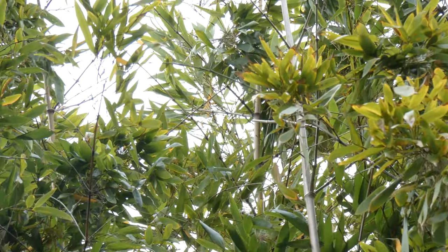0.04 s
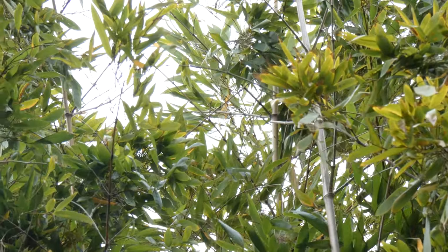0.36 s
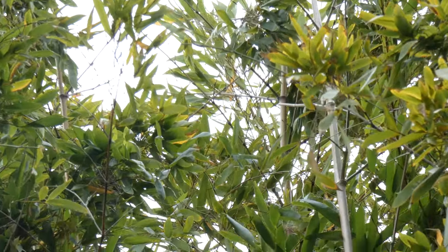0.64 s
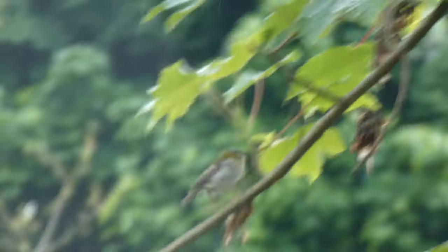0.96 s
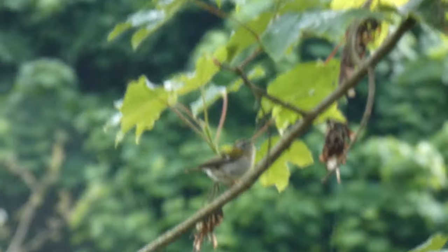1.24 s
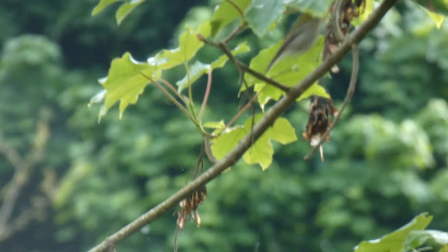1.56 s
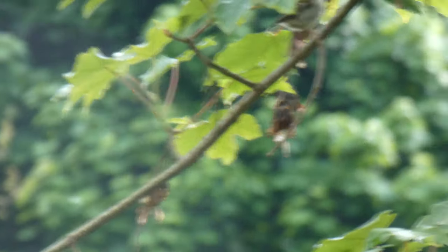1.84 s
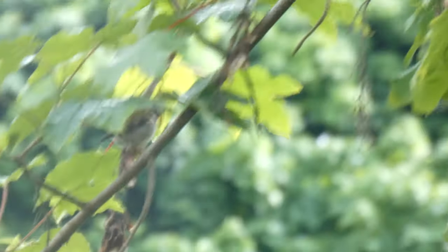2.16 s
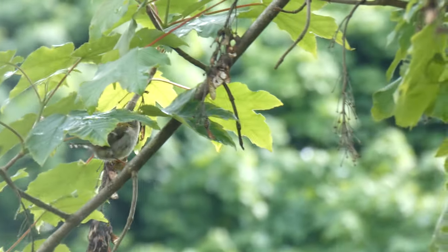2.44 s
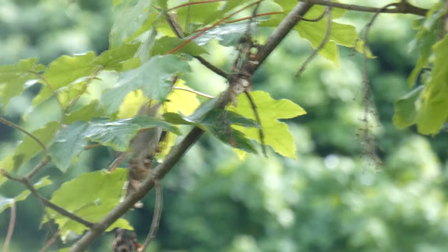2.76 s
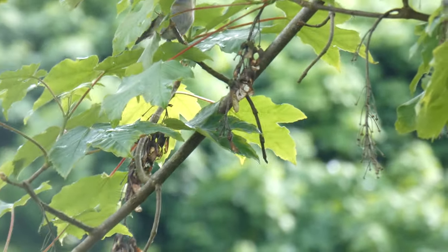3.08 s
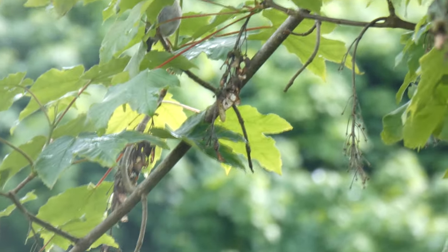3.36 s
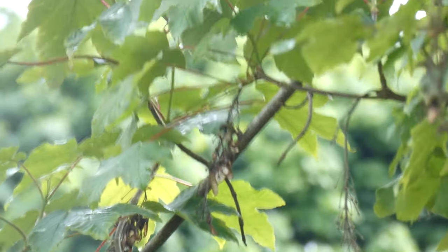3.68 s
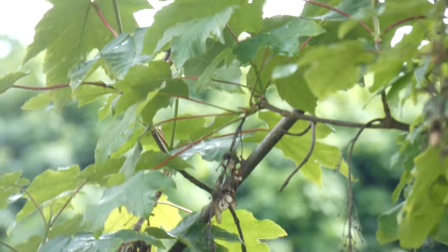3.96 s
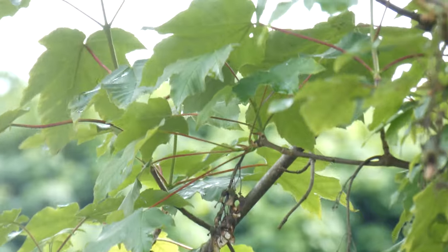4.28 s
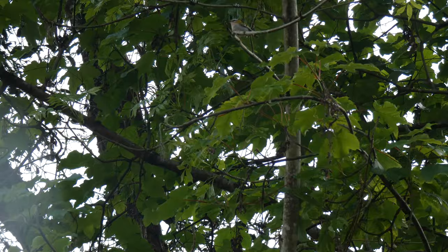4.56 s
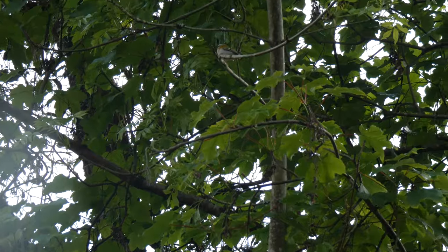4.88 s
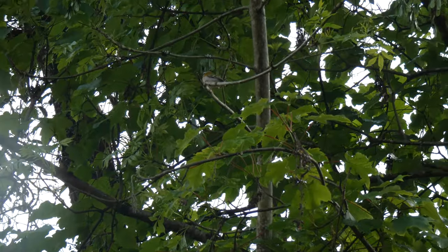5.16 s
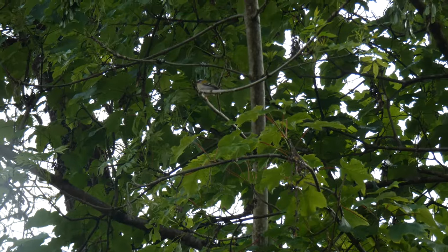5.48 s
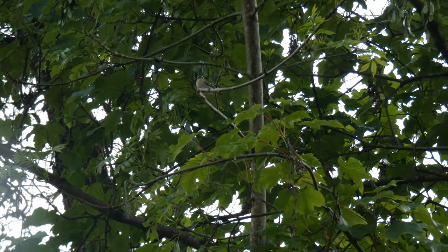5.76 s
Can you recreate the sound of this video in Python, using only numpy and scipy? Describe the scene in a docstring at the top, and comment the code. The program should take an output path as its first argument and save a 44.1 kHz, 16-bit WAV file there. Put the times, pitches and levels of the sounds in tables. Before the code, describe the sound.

Three short stretches of steady outdoor hush among trees, separated by silence. First come a nearby songbird's thin, rising whistles, with handling bumps and a zoom whirr right at the microphone. Next, the camera lens knocks softly and unevenly while other birds call faintly in the distance. Last, a more distant run of very high notes sounds over the knocking, closing with scuffs and clicks on the casing and the zoom motor again.

```python
"""Firecrest in leafy trees, with camera noises

Three short stretches, silence between. A firecrest's thin whistles near 7 kHz scatter in the foliage;
other birds call far off over a steady outdoor hush. A hand-held camera adds its own sounds:
fingers bump and scuff the casing, the zoom motor whirrs, the lens mechanism knocks softly."""
import sys
import numpy as np
from scipy import signal
from scipy.fft import rfft, irfft
from scipy.io import wavfile

SR = 44100
rng = np.random.default_rng(int(sys.argv[2]) if len(sys.argv) > 2 else 0)


def master(y):
    """Save y as 16-bit WAV."""
    cut = np.clip(np.atleast_2d(y).T, -1, 1)
    pcm = np.round(cut * 32767)  # scale
    wavfile.write(sys.argv[1], SR, pcm.astype(np.int16))


N = 261072
TIME = np.arange(N) / SR
FREQS = np.maximum(np.fft.rfftfreq(N, 1 / SR), 1)

# audible stretches: start/s, end/s
STRETCHES = [(0, .676), (.916, 4.287), (4.516, 5.93)]


def from_db(db):
    """Decibels to gain."""
    return 10 ** (np.asarray(db) / 20)


def unit_rms(x):
    """Scale to unit power."""
    return x / np.sqrt(np.mean(x ** 2) + 1e-20)


def pan(db):
    """Channel gains for left minus right level."""
    return from_db(np.array([[db], [-db]]) / 2)


def over_freqs(points):
    """Interpolate (f/Hz, value) rows on a log axis."""
    hz, value = np.transpose(points)
    return np.interp(np.log(FREQS), np.log(np.sort(hz)), value)


def drift(corner_hz):
    """Low-passed noise, unit RMS."""
    return unit_rms(irfft(rfft(rng.standard_normal(N)) / (1 + (FREQS / corner_hz) ** 4), N))


def resonate(x, hz, width_hz):
    """Two-pole resonance, unit peak gain."""
    r = np.exp(-np.pi * width_hz / SR)
    poles = [1, -2 * r * np.cos(2 * np.pi * hz / SR), r * r]
    return signal.lfilter(np.array([1, 0, -1]) * (1 - r * r) / 2, poles, x + 1e-18)


def band(x, hz, width_hz):
    """Two equal resonances in series."""
    return resonate(resonate(x, hz, width_hz), hz, width_hz)


def band_noise(hz, width_hz):
    """Narrowband noise, unit RMS."""
    return unit_rms(band(rng.standard_normal(N), hz, width_hz))


def thud(start_s, hz, decay_s):
    """Softly pushed mode: swells to 1 in one decay time, then dies."""
    out, start = np.zeros(N), int(start_s * SR)
    t = TIME[:min(SR // 5, N - start)]
    out[start:start + len(t)] = t / decay_s * np.exp(1 - t / decay_s) * np.sin(2 * np.pi * hz * t)
    return out


def hush(spectrum, sway_db):
    """Far trees and microphone hiss; channels most alike in the bass and near 3 kHz."""
    # f/Hz, left-right correlation
    correlation = [(60, .93), (150, 0.94), (300, 0.9), (700, 0.44), (1400, 0.77), (3100, 0.99),
                   (7000, 0.81), (10000, 0.66), (15000, .65)]
    # f/Hz, left minus right/dB
    balance = [(60, 0.5), (200, 0), (400, 3.5), (700, -1.5), (1300, 4), (4400, 1), (8000, -1), (15000, -6)]
    mid, side = rfft(rng.standard_normal((2, N)))
    alike = np.clip(over_freqs(correlation), 0, .999)
    stereo = mid + np.sqrt((1 - alike) / (1 + alike)) * side * [[1], [-1]]
    colour = from_db(over_freqs(spectrum) + over_freqs(balance) / 2 * [[1], [-1]])
    return np.sqrt(SR / 2) * irfft(stereo * colour, N) * from_db(sway_db * drift(3.2))


def syllable_note(start_s, length_s, hz, db, syllable):
    """Contour of one firecrest syllable: t/s, f/Hz, level/dB."""
    # per syllable: share of length, pitch offset/Hz, level offset/dB
    shapes = {"falling": [(0, -1200, -14), (.05, -400, -10.5), (.11, 521, -7), (.2, 558, -4.5),
              (.35, 492, -3.5), (.47, 451, 1), (.54, 20, -2.5), (.62, -39.5, -3.5), (.75, 229.5, -1),
              (.85, -11.5, -1), (.95, -11.5, 2), (1, 21, -0.5)], "wavy": [(0, -1150, -22), (.08, 427, -7.5),
              (.25, 50, -2), (.36, 188, -7), (.53, 305, 1.5), (.68, 118, -6), (.82, -44, 2.5),
              (1, 25, -13)], "hooked": [(0, -1150, -6), (.07, 222, -1), (.2, 220, -4.5), (.42, 388, 3),
              (.62, 412, -9), (.75, -540, -5), (.86, -150, 8.5), (1, 0, 4)], "arched": [(0, -1200, -14),
              (.09, -28, -17), (.25, 70, -5.5), (.45, 227, -1), (.63, 402, -6), (.71, -190, -2),
              (.86, -61, 5), (1, 40, 7)]}
    return np.array(shapes[syllable]) * [length_s, 1, 1] + [start_s, hz, db]


def firecrest(song, waver_hz, tremor_hz, flutter_db, buzz_hz, octave_db):
    """Near-pure whistle with a fast, uneven tremor; an optional buzz early in each note."""
    buzz_at_s, buzz_width_s, buzz_rate_hz, edge_s = .022, .013, 270, .0013
    out, flutter = np.zeros(N), from_db(flutter_db * drift(120))
    shake_hz = waver_hz * drift(160) + tremor_hz * band_noise(hz=240, width_hz=150)
    rasp = np.sin(2 * np.pi * np.cumsum(buzz_rate_hz * (1 + .3 * drift(200))) / SR)
    for note in song:
        s, hz, db = np.transpose(note)
        s = np.sort(s)
        on = (TIME >= s[0]) & (TIME <= s[-1])
        t = TIME[on]
        age = t - s[0]
        buzz = buzz_hz * np.exp(-((age - buzz_at_s) / buzz_width_s) ** 2) * rasp[on]
        phase = 2 * np.pi * np.cumsum(np.interp(t, s, hz) + shake_hz[on] + buzz) / SR
        tone = np.sin(phase) + from_db(octave_db) * np.sin(2 * phase)
        edges = np.clip(np.minimum(age, s[-1] - t) / edge_s, 0, 1)
        out[on] += edges * from_db(np.interp(t, s, db)) * tone
    return np.sqrt(2) * out * flutter


def foliage(x, wet_db, t60_s, spread):
    """Direct sound plus dense echoes off leaves and trunks, nearly alike in both channels."""
    t = TIME[:SR]
    mid, side = rng.standard_normal((2, SR)) * from_db(-60 * t / t60_s) * (1 - np.exp(-t / .004))
    echoes = (mid + spread * side * [[1], [-1]]) / np.sqrt(np.sum(mid ** 2))
    return x + from_db(wet_db) * signal.fftconvolve(echoes, x[None], axes=1)[:, :N]


def casing(force, damping):
    """Camera body modes, alternating in sign; a second, wider filter keeps the valleys deep."""
    # f/Hz, width/Hz, level/dB
    modes = [(315, 99, 0.5), (958, 180, -19.5), (1740, 130, .5), (2327, 50, 5.5), (2833, 170, 2.5),
             (3330, 230, 0), (4270, 180, -9), (4870, 100, -7), (5520, 100, -4.5), (9900, 2800, -15)]
    return sum((-1) ** k * from_db(db) * resonate(resonate(force, hz, damping * width), hz, 4 * width)
               for k, (hz, width, db) in enumerate(modes))


def handling(crack_hz, finger_pan_db, grip_hz):
    """Gritty clicks and scuffs ring the casing; soft fingers rub and thump it."""
    # zoom lever and gear clicks: t/s, ring peak/dB, f/Hz
    clicks = [(0.459, -41, 3500), (0.4864, -28, 2600), (0.4883, -27, 3000), (.581, -32, 2780),
              (0.611, -32, 3250), (0.6141, -28.5, 2384), (.919, -33, 3380), (5.6364, -35, 2930),
              (5.6455, -29.5, 2780), (5.6478, -37, 1870), (5.658, -42, 1990), (5.681, -35, 1900),
              (5.6837, -36, 2900), (5.724, -35.5, 2780), (5.8513, -25.5, 2770), (5.8539, -28.5, 3180)]
    # finger scuffs: t/s, grit/dB, decay/s, crack/dB
    scuffs = [(.005, -50, 0.024, -71), (.157, -56, 0.03, -80), (5.63, -39.5, 0.008, -64.5),
              (5.637, -35, 0.005, -76), (5.6455, -33, 0.0024, -61), (5.652, -37.5, 0.025, -76),
              (5.67, -38.5, 0.013, -82), (5.681, -30, 0.0027, -35), (5.696, -44, 0.0076, -80),
              (5.798, -41, 0.0087, -80)]
    # hand rubbing: t/s, level/dB
    grip_levels = [(0, -58.5), (.15, -51), (.25, -63.5), (.3, -45), (.43, -69.5), (.52, -76.5), (.68, -63)]
    # finger bumps: t/s, level/dB, centre/Hz, spread/octaves
    bumps = [(.283, -33.5, 470, 0.41), (.485, -39, 363, 0.37), (5.631, -47, 500, .3),
             (5.645, -32.5, 1850, 0.36), (5.656, -35, 506, 0.36), (5.681, -36, 500, 4.6),
             (5.694, -38, 670, 0.88), (5.707, -32.5, 245, 0.34), (5.72, -45, 245, 0.29),
             (5.798, -46.5, 232, 2.3), (5.85, -38, 320, 0.5)]
    click_decay_s, finger_damping = .0036, 1.8
    force, snap = np.zeros((2, N))
    contacts = [(s, db - 10, click_decay_s, db - 60) for s, db, _ in clicks] + list(scuffs)
    for s, grit_db, decay_s, crack_db in contacts:
        fade = (TIME >= s) * np.exp(-np.clip((TIME - s) / decay_s, 0, 20))
        force += from_db(grit_db) * fade
        snap += from_db(crack_db) * fade ** 2
    rings = sum(from_db(db) * thud(s, hz, decay_s=.00088) for s, db, hz in clicks)
    grit = rng.standard_normal(N) + .56 * rng.standard_normal((2, N))
    scrape = casing(force * grit, finger_damping) / np.std(casing(grit[0], finger_damping))
    skin = from_db(-13.5) * force * unit_rms(band(grit, hz=1305, width_hz=2000))
    crack = 3 * band(snap * grit, crack_hz, width_hz=5000)
    thumps = sum(finger_bump(*row) for row in bumps)
    thumps = signal.sosfilt(signal.butter(4, 85, "high", fs=SR, output="sos"), thumps)
    grip_gain = from_db(np.interp(TIME, *np.transpose(grip_levels))) * (TIME < STRETCHES[0][1])
    grip = grip_gain * unit_rms(band(grit, grip_hz, width_hz=300))
    return scrape + skin + rings + crack + (thumps + grip) * pan(finger_pan_db)


def zoom_motor(run, uneven_db, rub, spread, soft_hz, gear_hz, gear_db, whine_hz, whine_db, rub_pulse):
    """Each turn ticks the casing; the gears rub hardest just after it and whine in one mode."""
    play_turns, tooth_detune = .07, .089
    s, rates, db = np.transpose(run)
    s = np.sort(s)
    rate_hz = np.interp(TIME, s, rates)
    gain = from_db(np.interp(TIME, s, db)) * (TIME >= s[0]) * (TIME <= s[-1])
    turns = np.cumsum(rate_hz * (1 + .008 * drift(55)) * (TIME >= s[0])) / SR
    turns = np.maximum.accumulate(turns + play_turns * drift(70) * (turns > 0))
    ticks = np.diff(np.floor(turns), prepend=0) * np.sqrt(SR / rate_hz)
    ticks *= from_db(uneven_db * np.tanh(drift(90)))
    ticks = signal.sosfilt(signal.butter(3, soft_hz, fs=SR, output="sos"), ticks)
    tooth = rng.integers(-1, 2, N)   # each tick rings near the gear's pitch in its own colour
    teeth = sum(resonate(ticks * (tooth == k), gear_hz * (1 + k * tooth_detune), 900)
                for k in (-1, 0, 1))
    friction = rub * rng.standard_normal(N) + spread * rng.standard_normal(N) * [[1], [-1]]
    friction *= 1 + rub_pulse * np.cos(2 * np.pi * turns - 1)
    rattle = casing(.5 * ticks + from_db(gear_db) * teeth + friction, damping=1.03)
    whine = from_db(whine_db) * band_noise(whine_hz, width_hz=220)
    return gain * (rattle / np.std(rattle[:, turns > 0]) + whine)


def finger_bump(start_s, db, centre_hz, spread_oct):
    """A finger pushes the camera's low modes, most those near centre_hz."""
    # f/Hz, level/dB, decay/s
    modes = [(145, 3, 0.0056), (247, 2, 0.0052), (484, -1, 0.0044), (725, -6, 0.0048), (988, 3, 0.00204),
             (1880, -3, 0.005)]
    return sum(from_db(db + mode_db) * np.exp(-.5 * (np.log2(hz / centre_hz) / spread_oct) ** 2)
               * thud(start_s, hz, decay_s) for hz, mode_db, decay_s in modes)


def bird_calls(calls, waver_hz):
    """Gliding whistles that swell and fade; a wide waver makes thin trills."""
    out, waver = np.zeros(N), drift(240)
    for s, length_s, start_hz, end_hz, db in calls:
        on = (TIME >= s) & (TIME < s + length_s)
        part = (TIME[on] - s) / length_s
        hz = start_hz + (end_hz - start_hz) * part + waver_hz * waver[on]
        swell = np.sqrt(np.abs(np.sin(np.pi * part)))
        out[on] += from_db(db) * swell * np.sin(2 * np.pi * np.cumsum(hz) / SR)
    return out


def distant_birds():
    """Far whistles, faint contact calls and trills, scattered by the trees."""
    # all three: t/s, length/s, start/Hz, end/Hz, level/dB
    whistles = [(.513, 0.036, 3890, 3260, -42), (.646, 0.017, 4540, 4630, -47.5),
                (.661, 0.025, 3790, 3500, -43.5), (1.45, 0.071, 3580, 3250, -46),
                (1.729, 0.06, 4730, 4400, -46), (1.95, 0.071, 4480, 4635, -50.5),
                (2.07, 0.11, 4630, 4490, -57.5), (2.34, 0.067, 3870, 3714, -47.5),
                (2.354, 0.079, 3410, 3290, -49), (2.47, 0.079, 3808, 3804, -42.5),
                (3.065, 0.031, 3630, 3580, -49), (3.092, 0.06, 3360, 3370, -51.5),
                (3.158, 0.095, 3110, 2980, -53), (3.875, 0.055, 3400, 3290, -54),
                (3.948, 0.059, 3110, 2995, -48.5), (5.44, 0.035, 3510, 3410, -49.5),
                (5.715, 0.081, 4550, 4580, -53.5)]
    contact_calls = [(2.62, 0.017, 6330, 6520, -57.5), (3.829, 0.016, 6640, 6680, -66)]
    trills = [(1.23, 0.5, 7040, 7310, -68.5), (1.7, 0.64, 6750, 6750, -71)]
    calls = bird_calls([*whistles, *contact_calls], waver_hz=42) + bird_calls(trills, waver_hz=348)
    return foliage(calls, wet_db=.5, t60_s=.75, spread=.098)


def lens(hz, decay_s, chatter_db, chatter_per_s, width_hz, lower_hz, lower_db):
    """The lens mechanism keeps adjusting: clear knocks on one mode, small nudges on two."""
    # t/s, peak/dB
    clear_knocks = [(.938, -43), (.991, -50), (1.065, -48.5), (1.183, -44.5), (1.379, -47), (1.44, -45),
                    (1.507, -48.5), (1.638, -48), (1.683, -51), (1.825, -41.5), (1.957, -45),
                    (2.038, -40.5), (2.113, -51), (2.166, -41), (2.236, -44.5), (2.272, -60),
                    (2.333, -44.5), (2.426, -57), (2.505, -41.5), (2.545, -45.5), (2.726, -48),
                    (2.76, -48.5), (2.856, -49), (3.015, -46.5), (3.158, -44.5), (3.215, -47), (3.277, -56),
                    (3.368, -44.5), (3.4, -50), (3.432, -46), (3.496, -47), (3.558, -49.5), (3.676, -46.5),
                    (3.736, -47), (3.868, -46), (3.96, -45.5), (4.055, -43), (4.101, -52.5), (4.159, -42.5),
                    (4.247, -46), (4.521, -48.5), (4.585, -49), (4.617, -42), (4.75, -48.5), (4.821, -43),
                    (4.923, -41.5), (4.957, -44), (5.003, -46), (5.053, -41), (5.125, -43.5), (5.179, -58),
                    (5.25, -41), (5.355, -48.5), (5.415, -40), (5.456, -47.5)]
    # chatter in stretches two and three: t/s, level/dB
    effort = [
        [(0.93, -56), (1.73, -56), (1.79, -62), (1.87, -50.5), (2.1, -51.5), (2.55, -52.5), (2.65, -60),
         (3.42, -52), (3.6, -55), (4.28, -55)],
        [(4.52, -55), (5.45, -56.5), (5.55, -63), (5.6, -54)],
    ]
    knocks = sum(from_db(db) * thud(s, hz * (1 + .022 * rng.standard_normal()), decay_s)
                 for s, db in clear_knocks)
    nudges = (rng.random(N) < chatter_per_s / SR) * rng.choice([-1, 1], N)
    main, lower = (unit_rms(band(nudges, f, width_hz)) for f in (hz, lower_hz))
    gain = from_db(chatter_db + np.interp(TIME, *np.vstack(effort).T)) * (TIME > STRETCHES[1][0])
    return knocks + gain * (main + from_db(lower_db) * lower)


def opening_note(start_s, length_s, start_hz, end_hz, flick_hz, db, peak_share):
    """Contour of a firecrest note that slopes, swells and may end in an upward flick: t/s, f/Hz, level/dB."""
    swell_db, fade_db, flick_s, hold_s = 16.5, 10.5, .0063, .0043
    part = np.linspace(0, 1, num=60)
    to_top_s = np.maximum((1 - part) * length_s - hold_s, 0)
    hz = start_hz + (end_hz - start_hz) * part ** .77 + flick_hz * np.exp(-to_top_s / flick_s)
    envelope_db = np.interp(part, [0, peak_share, 1], [-swell_db, 0, -fade_db])
    return np.transpose([start_s + length_s * part, hz, db + envelope_db])


def scene():
    """Birds and camera sounds over a different hush in each stretch."""
    # close, rising climax; farther song after its opening: t/s, length/s, f/Hz, level/dB, syllable
    near_notes = [(-.09, 0.11, 6870, -28.5, "falling"), (.062, 0.11, 7083, -29.5, "falling"),
                  (0.2, .105, 7280, -30, "falling"), (0.356, 0.11, 7486, -29, "falling")]
    far_notes = [(5.342, 0.1, 7060, -38.5, "wavy"), (5.485, 0.12, 7215, -40, "wavy"),
                 (5.632, .119, 7230, -40.5, "hooked"), (5.798, 0.14, 7370, -38.5, "arched")]
    # farther song's opening: t/s, length/s, start/Hz, end/Hz, flick/Hz, level/dB, peak at share of length
    opening = [(4.541, 0.12, 6970, 7030, 0, -41.5, 0.41), (4.688, 0.12, 7030, 6990, 0, -41, 0.26),
               (4.826, 0.071, 6880, 7000, 268, -36.5, 0.82), (4.939, 0.1, 6540, 7040, 580, -39.5, 0.84),
               (5.074, .098, 6370, 7010, 780, -41, 0.65), (5.216, 0.092, 6300, 7030, 787, -37.5, 0.95)]
    # two motor runs: t/s, turn rate/Hz, level/dB
    zoom_runs = [
        [(.275, 98, -59), (.3, 94, -50.5), (.333, 102, -46.5), (.347, 106, -43), (.36, 120, -45.5),
         (.44, 128, -43), (.46, 148, -41.5), (.53, 147, -47), (.59, 120, -45), (.68, 139, -47.5)],
        [(5.698, 76, -53), (5.747, 66, -52), (5.777, 76, -49), (5.8, 120, -46), (5.83, 120, -47),
         (5.87, 145, -41.5), (5.93, 140, -49)],
    ]
    # hush spectra: f/Hz, density/(dB per Hz)
    grove = [(28, -112), (50, -99), (100, -84.5), (250, -82.5), (600, -92), (1000, -89), (1400, -99.5),
             (2500, -101.5), (3200, -100.5), (4500, -104), (10000, -111), (15000, -118)]
    branch = [(28, -115), (48, -104), (64, -102), (80, -93), (96, -77.5), (120, -90.5), (160, -87),
              (230, -80.5), (330, -89.5), (900, -85.5), (1400, -90), (2200, -88.5), (3300, -84),
              (5000, -91.5), (7700, -109), (9500, -97), (15000, -116)]
    wood = [(28, -114), (50, -103), (92, -84.5), (125, -85), (220, -78), (350, -84), (650, -86.5),
            (1000, -82.5), (1600, -88), (2300, -87), (3300, -85), (5000, -90.5), (7900, -108), (9500, -97),
            (15000, -115)]
    near_song = [syllable_note(*row) for row in near_notes]
    far_song = [opening_note(*row) for row in opening] + [syllable_note(*row) for row in far_notes]
    near = firecrest(near_song, waver_hz=35, tremor_hz=35.2, flutter_db=3, buzz_hz=340.5,
                     octave_db=-47.5)
    near = foliage(near, wet_db=-5.5, t60_s=.27, spread=.089)
    far = firecrest(far_song, waver_hz=30, tremor_hz=39.5, flutter_db=1.5, buzz_hz=0, octave_db=-35)
    far = foliage(far, wet_db=-5.5, t60_s=.56, spread=.26)
    birds = near + far + distant_birds()
    knocks = pan(-8) * lens(hz=502.4, decay_s=.0083, chatter_db=-2, chatter_per_s=180, width_hz=42.6,
                            lower_hz=404, lower_db=-7)
    first_zoom = zoom_motor(zoom_runs[0], uneven_db=1.5, rub=.57, spread=.27, soft_hz=3900,
                            gear_hz=2930, gear_db=-3, whine_hz=1715, whine_db=-10, rub_pulse=.34)
    last_zoom = zoom_motor(zoom_runs[1], uneven_db=1, rub=1, spread=.61, soft_hz=4200,
                           gear_hz=3260, gear_db=3, whine_hz=1030, whine_db=-18, rub_pulse=.48)
    fingers = handling(crack_hz=11480, finger_pan_db=-3, grip_hz=270.4)
    sources = birds + knocks + first_zoom + last_zoom + fingers
    airs = hush(grove, sway_db=2.5), hush(branch, sway_db=.52), hush(wood, sway_db=-.1)
    return sum((sources + air) * ((TIME >= start) & (TIME < end))
               for air, (start, end) in zip(airs, STRETCHES))


def record(dry):
    """Steep low-pass."""
    cutoff_hz = 15600
    return signal.sosfilt(signal.ellip(10, .1, 90, cutoff_hz, fs=SR, output="sos"), dry + 1e-18)


dry = scene()
out = record(dry)
master(out)
```